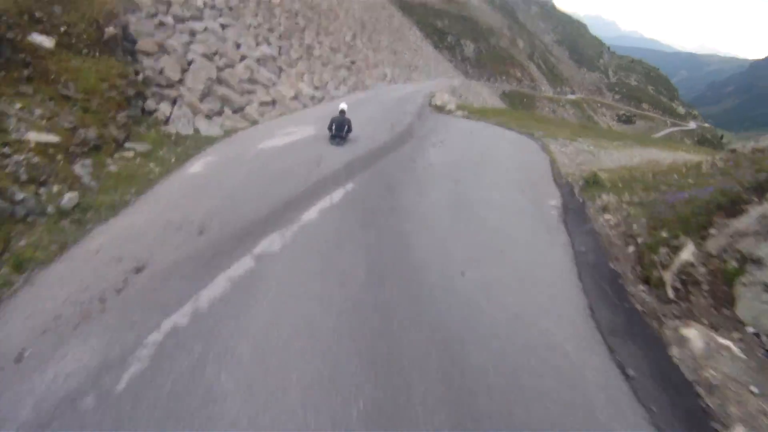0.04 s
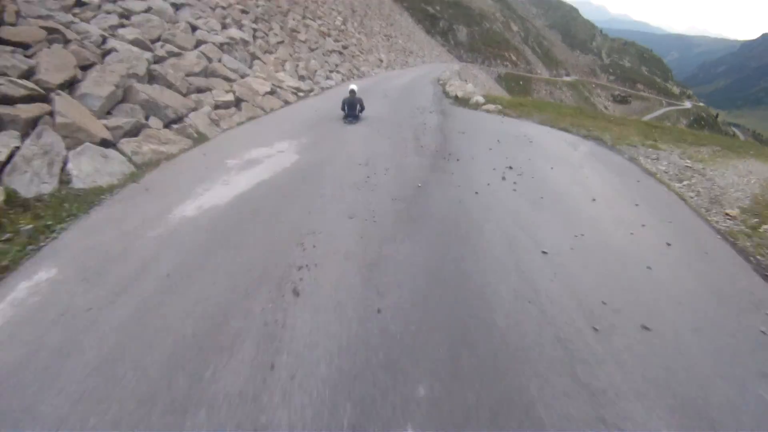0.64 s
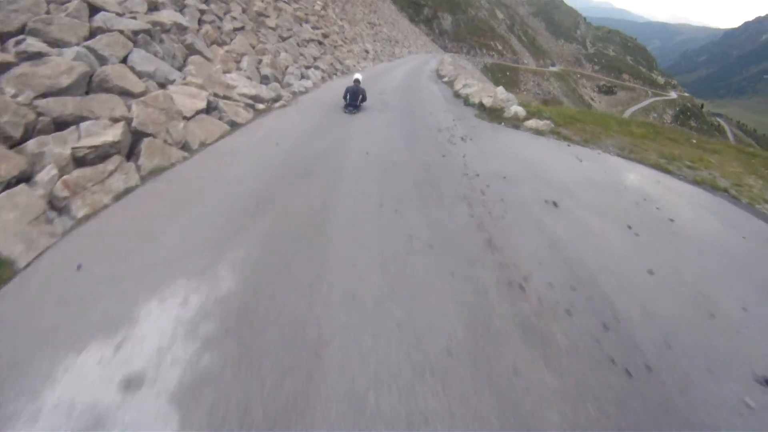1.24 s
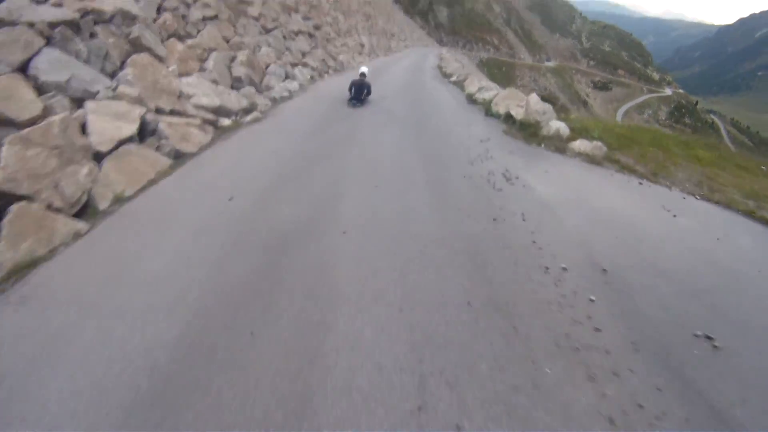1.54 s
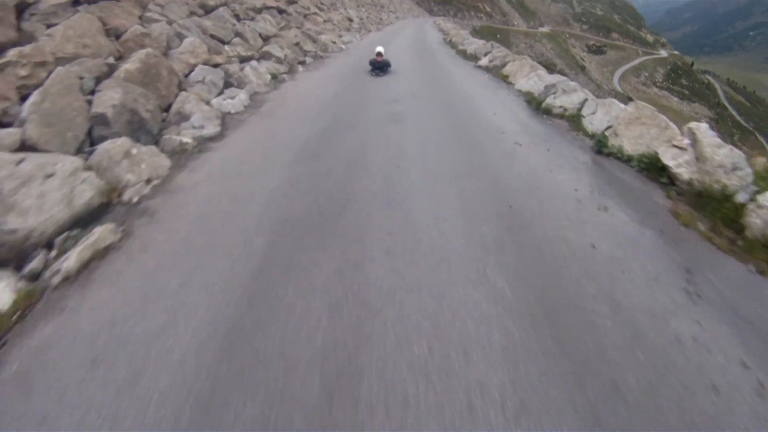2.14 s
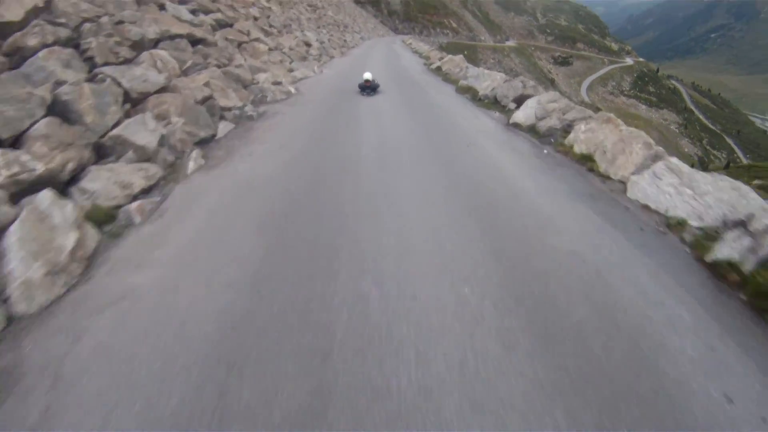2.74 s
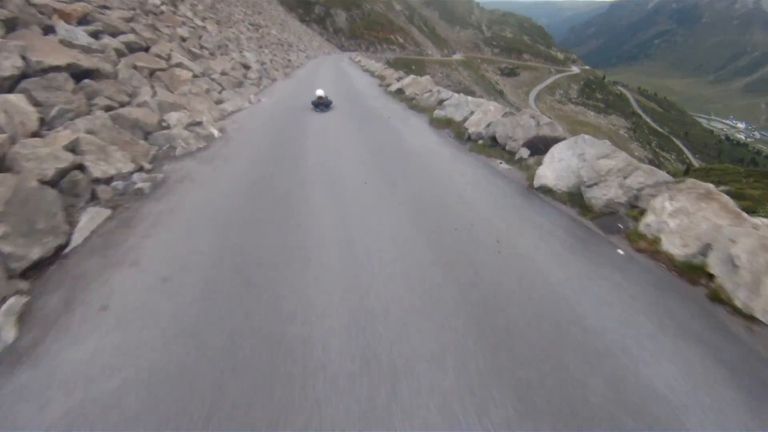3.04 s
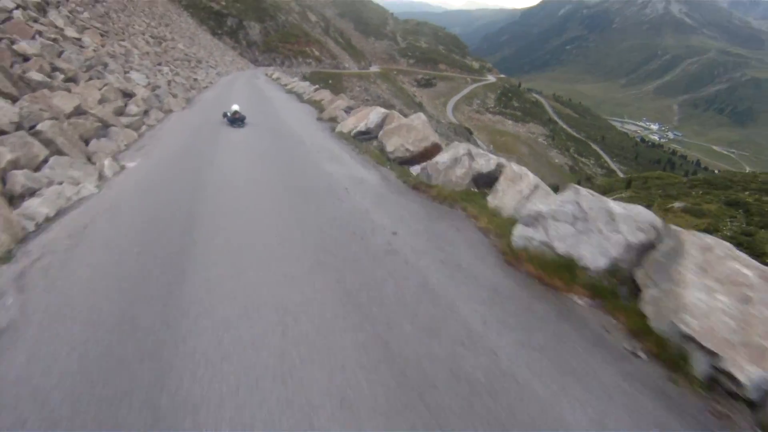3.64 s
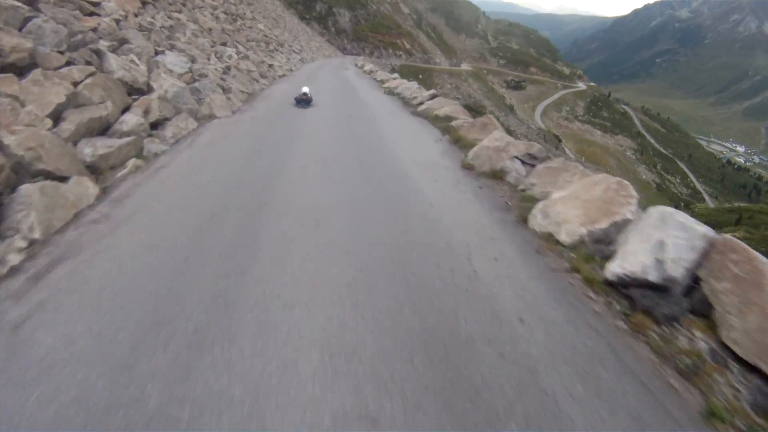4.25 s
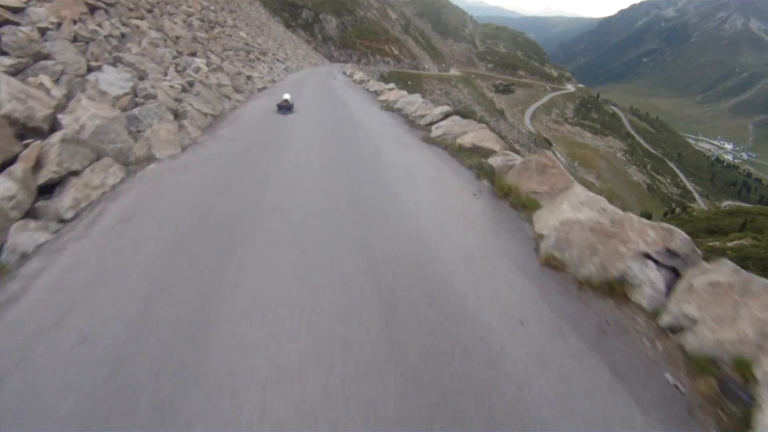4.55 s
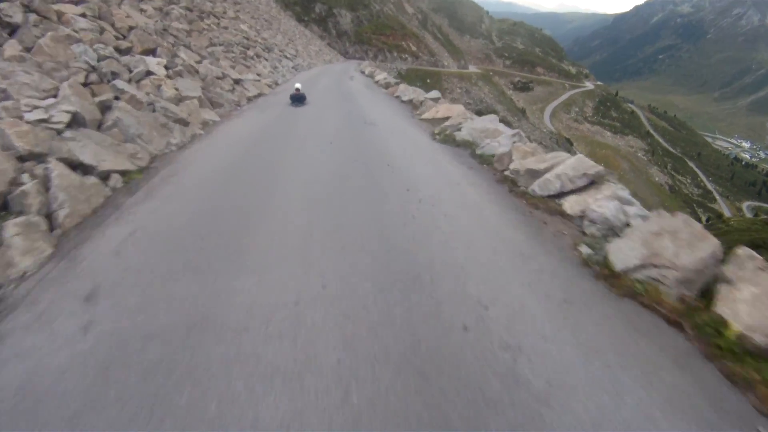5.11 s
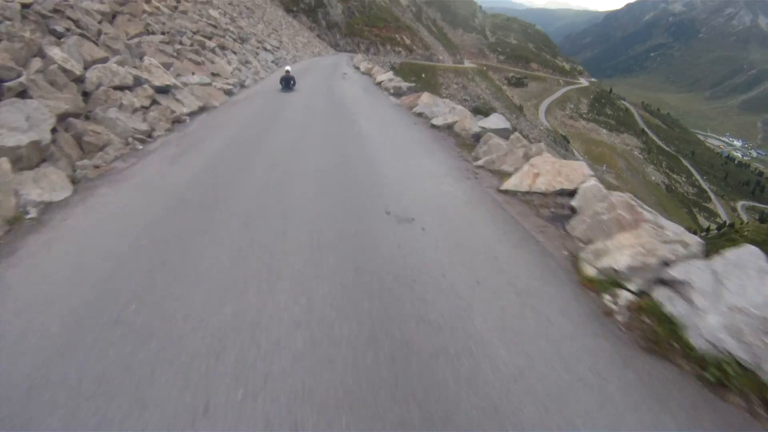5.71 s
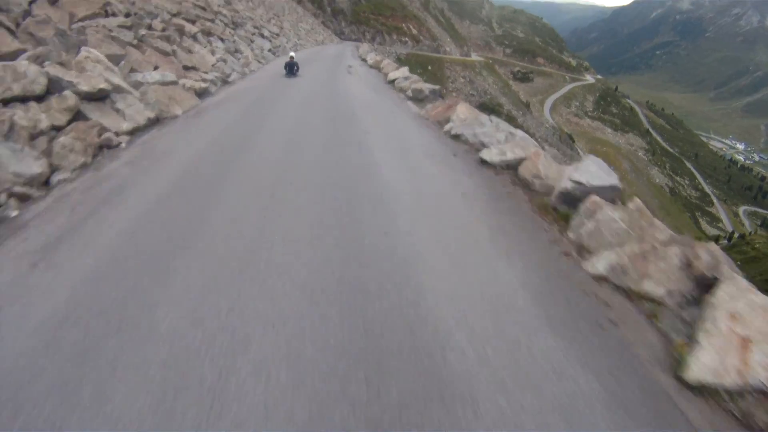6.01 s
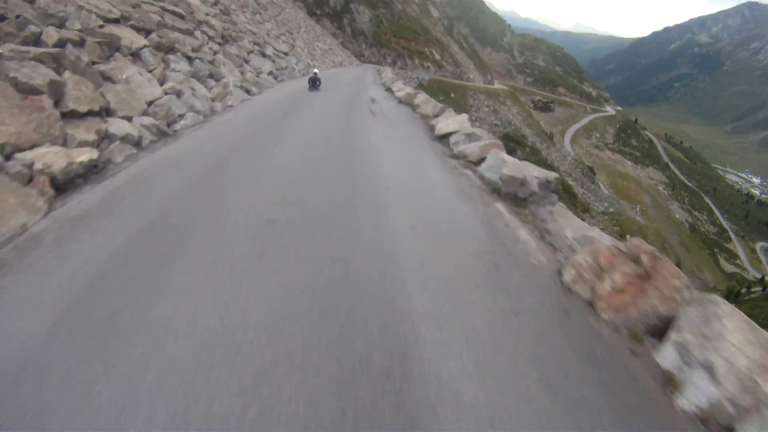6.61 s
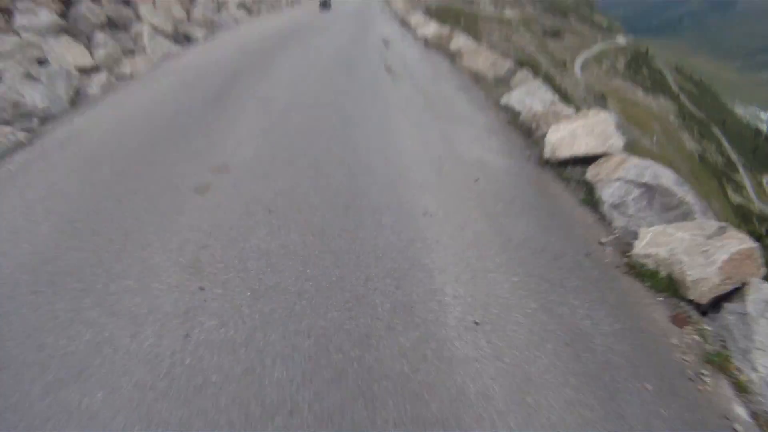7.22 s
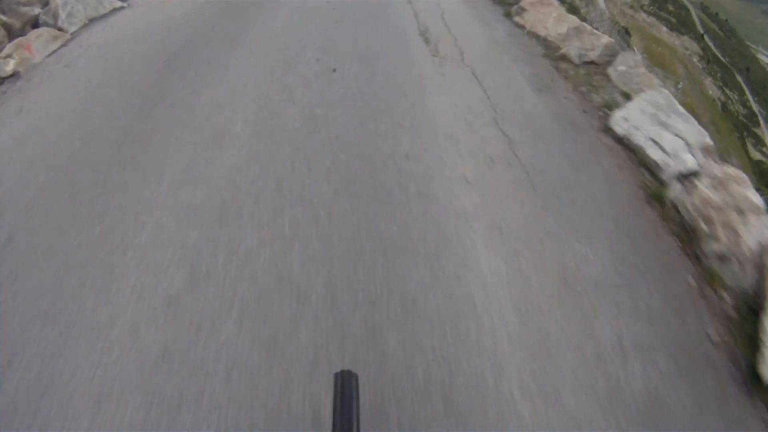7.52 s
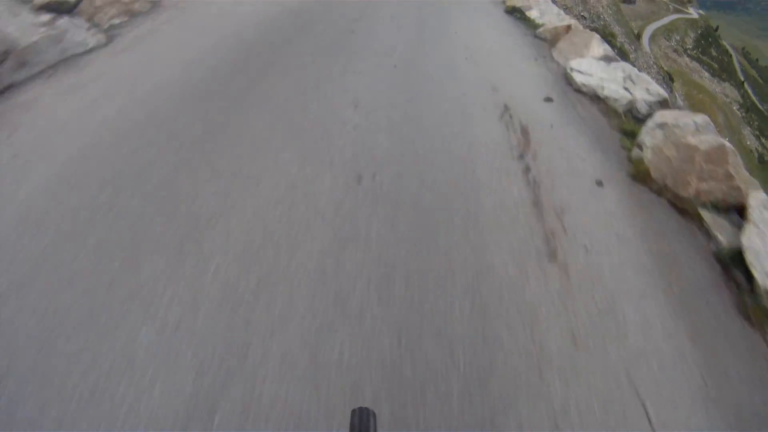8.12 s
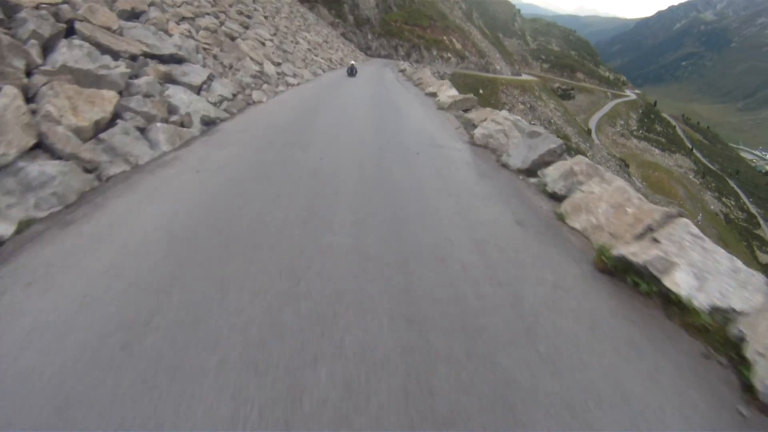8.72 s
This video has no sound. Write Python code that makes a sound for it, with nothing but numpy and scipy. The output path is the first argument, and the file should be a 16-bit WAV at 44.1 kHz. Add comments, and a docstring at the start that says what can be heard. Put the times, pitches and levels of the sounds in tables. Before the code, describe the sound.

A small gravity cart coasts down a mountain road in open air, heard from a microphone on board. From start to finish, about nine seconds, tyres roar and hum on grainy asphalt, the frame drones low and wind hisses and buffets the microphone. In the first 0.8 seconds, bumps thump the chassis, with metal clanks, chattering light parts and short creaks from the shell. A quick run of six ripples follows from 1.2 to 1.6 seconds, then harder bumps and another clatter around 1.7 to 1.9. One smaller bump rattles and creaks near 3.1 seconds. The ride then runs smoother, while the rumble, hum and buffeting gradually grow with speed. Around 6 to 7 seconds, dust patters on the underside, almost a hiss. Single bits of grit tick sharply at about 7.1, 7.6 and 8.6 seconds, with a faint rattle near 8.2. A thin glassy fizz lies over everything.

```python
"""A small gravity cart coasts down a mountain road, heard through a camera riding on it.
From the start, asphalt grain makes the tyres roar and hum, the frame drones and wind buffets the camera.
For about three seconds, bumps and a run of ripples thump the chassis: metal clanks, light parts chatter
and the shell creaks. The low sounds grow with speed; near 6.5 s dust patters on the underside, and then
three bits of grit tick against it. Throughout, the camera's sample-and-hold adds a glassy fizz."""
import sys
import numpy as np
from scipy import signal
from scipy.fft import rfft, irfft, next_fast_len
from scipy.io import wavfile
from scipy.ndimage import map_coordinates

SR = 44100
rng = np.random.default_rng(int(sys.argv[2]) if len(sys.argv) > 2 else 0)


def master_out(mix):
    """Clip the mix to full scale and print it as 16-bit PCM to the path in sys.argv[1]."""
    frames = np.transpose(np.atleast_2d(mix))
    ceiling = np.clip(frames, -1, 1)
    pcm = np.round(ceiling * 32767).astype(np.int16)
    wavfile.write(sys.argv[1], SR, pcm)


N = 386316


def tyres(road_db, from_middle_s):
    """Roughness excitation: stones drive the tread and the hollow tyre under a fluttering load."""
    # tread roar: frequency_hz, level_db
    roar_spectrum = [(250, -17.5), (560, -4.5), (850, -2.5), (980, -7.5), (1300, -1.5), (1460, -1),
                     (1630, 2), (1950, -5.5), (2600, -0.5), (2880, -1.5), (3300, -9), (4100, -17),
                     (4500, -13), (5600, -24)]
    # frame resonances that colour the roar: centre_hz, width_hz, lift_db
    frame_peaks = [(866, 43, 7), (1705, 170, 4.5), (2310, 180, 3), (3047, 165, 9.5), (4000, 64, -6)]
    # resonance of the hollow tyre: pitch_hz, width_hz, level_db
    tyre_modes = [(700.4, 68, 0)]
    load_db = 0.7 * drift(rate_hz=55)
    roar = colour(impacts(per_s=9000, spread_db=4), roar_spectrum, frame_peaks)
    hum = rms_one(resonate(impacts(per_s=5000, spread_db=2), tyre_modes))
    roar_db = -50.5 + 1.34 * road_db + load_db
    hum_db = -57 + 0.83 * road_db + 0.33 * from_middle_s
    return roar * from_db(roar_db) + hum * from_db(hum_db)


def frame_drone(air_db, from_middle_s, shake):
    """Forced vibration: the frame drones in a low band, louder with air stream, speed and shaking."""
    # response of the frame: frequency_hz, level_db
    drone_spectrum = [(200, -28), (310, -6.5), (385, 4.5), (440, 0.5), (520, -3.5), (700, -13.5)]
    drone_db = -64.5 + 0.74 * air_db + 0.7 * from_middle_s + 9.5 * shake
    return noise(drone_spectrum, drone_db)


def wind(air_db, from_middle_s, shake):
    """Turbulence: air hisses round the camera, and eddies press on it harder with speed and shaking."""
    # hiss of the flow: frequency_hz, level_db
    rush_spectrum = [(250, -11.5), (560, -3.5), (850, -7.5), (1050, -9), (1900, -12), (2120, 2),
                     (2420, 1.5), (2800, -9), (3500, -6.5), (3950, -10.5), (4400, -23.5), (5100, -12),
                     (5700, -16.5)]
    # eddy pressure: frequency_hz, level_db
    buffet_spectrum = [(10, -1.5), (20, 3.5), (30, -2.5), (45, -7.5), (60, -11.5), (80, -18.5),
                       (120, -35.5), (300, -40.5)]
    rush_db = -53 + 0.66 * air_db
    buffet_db = -43 + 0.15 * air_db + 0.5 * from_middle_s + 6 * shake
    return noise(rush_spectrum, rush_db) + noise(buffet_spectrum, buffet_db)


def road_jolts():
    """Impulsive forcing: each bump, and each of six evenly spaced ripples, kicks the wheels once."""
    # single bumps: start_s, level_db
    bumps = [(0.043, -26), (.328, -30), (0.415, -24), (0.499, -19.5), (.677, -31.5), (1.717, -21.5),
             (1.79, -19.5), (2.04, -36), (3.074, -29)]
    first_s, gap_s, first_db, loss_db = 1.232, 0.069, -24, 0.26
    ripples = [(first_s + k * gap_s, first_db - k * loss_db) for k in range(6)]
    jolts = np.zeros(N)
    for start_s, level_db in bumps + ripples:
        jolts[round(start_s * SR)] = from_db(level_db)
    return jolts


def shaking(jolts, settle_s=0.33, knee_db=-26.5):
    """Leaky integration: jolts pile up and die away, giving a shaking that saturates from 0 towards 1."""
    piled_up = signal.lfilter([1], [1, -np.exp(-1 / (settle_s * SR))], jolts)
    return np.tanh(piled_up / from_db(knee_db))


def chassis(road_db, from_middle_s, shake, jolts, low_hz=21.8, high_hz=46):
    """Damped response: the chassis rumbles on the asphalt, and each jolt heaves it through one swing."""
    # chassis rumble: frequency_hz, level_db
    rumble_spectrum = [(40, -34), (70, 1.5), (110, -1), (155, -0.5), (200, -6.5), (280, -11.5), (500, -16)]
    rumble_db = -56 + 0.43 * road_db + 0.58 * from_middle_s + 3 * shake
    kick = signal.unit_impulse(SR // 4)
    cushioned = signal.sosfilt(signal.butter(5, high_hz, fs=SR, output="sos"), kick)
    swing = signal.sosfilt(signal.butter(2, low_hz, "high", fs=SR, output="sos"), cushioned)
    thumps = signal.fftconvolve(jolts, swing / np.abs(swing).max())[:N]
    return noise(rumble_spectrum, rumble_db) + thumps


def metal_clanks():
    """Modal ringing: loose metal knocks and sounds at its natural frequencies."""
    # knocks: start_s, level_db, decay_s
    knocks = [(.2845, -34, .0053), (.2992, -37, 0.0037), (.3062, -30, .0063), (.3411, -26.5, 0.0039),
              (.3454, -28.5, .0037), (.4175, -31, 0.015), (.4492, -27.5, 0.0017), (.4523, -23.5, .0033),
              (1.6533, -27.5, .0094), (1.6888, -24.5, 0.0031)]
    # resonances of the metal: pitch_hz, width_hz, level_db
    metal_modes = [(1610, 100, -8), (2300, 400, -8), (2640, 130, -5), (3105, 100, 2.5), (4000, 300, -12),
                   (5000, 600, -16)]
    return rattle(knocks, metal_modes, contacts_per_s=3200, first_blow=1.3)


def light_chatter(road_db, shake):
    """Contact and rebound: light parts strike, fall back once, and tick at random while the cart shakes."""
    # strikes: start_s, level_db, decay_s
    strikes = [(0.2114, -34, 0.0057), (.3676, -39, 0.0083), (0.3964, -35, 0.0092), (0.4663, -32, 0.0027),
               (0.4777, -31.5, 0.015), (0.7436, -39, 0.021), (1.2725, -36.5, 0.0063), (1.556, -35, 0.0033),
               (1.5936, -32.5, .007), (1.698, -30, 0.005), (1.7777, -27, .004), (1.8297, -33.5, .004),
               (1.8644, -38, .006), (2.2323, -43, .004), (3.0178, -41, 0.0059), (3.1168, -43, 0.0041),
               (3.137, -35.5, 0.0085), (8.15, -39.5, 0.0065)]
    # resonances of the light parts: pitch_hz, width_hz, level_db
    part_modes = [(1580, 800, -9.5), (2610, 1100, -8), (3504, 190, 1), (4084, 89, -5), (4300, 2000, -12.5)]
    rebound_s, loss_db = 0.0068, 8.5
    rebounds = [(s + rebound_s, db - loss_db, decay_s) for s, db, decay_s in strikes]
    ticks_per_s, tick_decay_s = 18 * shake ** 2, 0.0046
    tick_samples = np.flatnonzero(rng.random(N) < ticks_per_s / SR)
    tick_db = -43.5 + road_db + 2.5 * rng.standard_normal(N)
    ticks = [(i / SR, tick_db[i], tick_decay_s) for i in tick_samples]
    hits = strikes + rebounds + ticks
    return from_db(1) * rattle(hits, part_modes, contacts_per_s=2100, first_blow=0.73)


def shell_creaks():
    """Flexural vibration: the body shell bends, and flurries of tiny contacts ring its modes."""
    # creaks: start_s, level_db, decay_s
    creaks = [(.135, -33, .025), (.287, -31.5, .02), (.408, -35, 0.0069), (.6, -37.5, 0.0099),
              (.69, -40.5, .015), (1.735, -35, 0.011), (1.812, -30.5, .007), (3.095, -38.5, 0.013)]
    # resonances of the shell: pitch_hz, width_hz, level_db
    shell_modes = [(1560, 360, 2.5), (1940, 320, 9), (2600, 260, 6.5), (3130, 220, -5)]
    return from_db(0.5) * rattle(creaks, shell_modes, contacts_per_s=3500, first_blow=0.4)


def grit_ticks():
    """Impact excitation: a bit of grit strikes the chassis and rings it briefly."""
    # strikes: start_s, level_db, decay_s, tilt_db_per_octave
    strikes = [(7.1205, -22.5, .0016, 1.5), (7.6355, -26.5, .0022, 0), (8.6037, -22, .0018, .5)]
    # resonances of the chassis: pitch_hz, width_hz, level_db
    chassis_modes = [(850, 150, -10), (1550, 380, -2.5), (2120, 220, 0), (2400, 280, 1), (3200, 300, -10),
                     (3750, 200, -8), (4800, 700, -13)]
    return from_db(-0.7) * rattle(strikes, chassis_modes, contacts_per_s=5000, first_blow=2.3)


def dust(road_db):
    """Shot noise: grains patter on the underside and merge towards a hiss on one dusty stretch."""
    # resonances of the underside: pitch_hz, width_hz, level_db
    underside_modes = [(3300, 370, 0.5), (4080, 220, 0.5), (5600, 1000, -3.5)]
    middle_s, half_length_s, lift_db = 6.45, 0.42, 8.8
    thrown_db = road_db + lift_db * np.exp(-((np.arange(N) / SR - middle_s) / half_length_s) ** 2)
    grains_per_s = 450 * from_db(1.6 * thrown_db)
    grains = impacts(grains_per_s, spread_db=1.5) / np.sqrt(grains_per_s)  # equal power at any rate
    return from_db(-64 + 0.97 * thrown_db) * rms_one(resonate(grains, underside_modes))


def camera_case(x):
    """Resonance and antiresonance: the closed case lifts some narrow bands and swallows others."""
    # peaks and dips of the case: centre_hz, width_hz, lift_db
    case_bands = [(1314, 97, 2.5), (1397, 170, -2), (1920, 160, 0.5), (1980, 72, 2), (2936, 150, -2.5),
                  (3290, 110, -2.5), (3815, 150, -5.5), (3920, 170, 3), (4440, 160, -7), (4460, 68, 1)]
    for centre_hz, width_hz, lift_db in case_bands:
        x = x + (from_db(lift_db) - 1) * resonate(x, [(centre_hz, width_hz, 0)])
    return x


def rattle(hits, modes, contacts_per_s, first_blow):
    """Repeated contact: a blow and a dying flurry ring a part; an optional tilt brightens the hit."""
    out, t = np.zeros(N + SR), np.arange(SR // 10) / SR
    for start_s, level_db, decay_s, *tilt in hits:
        touching = rng.random(len(t)) < contacts_per_s / SR
        contacts = touching * rng.standard_normal(len(t)) * np.exp(-t / decay_s)
        contacts[0] = first_blow
        tilted_modes = [(hz, width_hz, db + sum(tilt) * np.log2(hz)) for hz, width_hz, db in modes]
        ring = resonate(contacts, tilted_modes)
        start = round(start_s * SR)
        out[start:start + len(t)] += from_db(level_db) * ring / np.abs(ring).max()
    return out[:N]


def impacts(per_s, spread_db):
    """Poisson process: independent clicks of random sign and uneven size."""
    struck = rng.random(N) < per_s / SR
    return struck * rng.choice([-1, 1], N) * from_db(spread_db * rng.standard_normal(N))


def resonate(x, modes):
    """Modal superposition: damped resonators in parallel, summed with alternating sign."""
    out = 0
    for k, (pitch_hz, width_hz, level_db) in enumerate(modes):
        radius = np.exp(-np.pi * width_hz / SR)
        poles = [1, -2 * radius * np.cos(2 * np.pi * pitch_hz / SR), radius ** 2]
        ring = (1 - radius ** 2) / 2 * signal.lfilter([1, 0, -1], poles, x)
        out = out + (-1) ** k * from_db(level_db) * ring
    return out


def colour(x, spectrum, peaks=()):
    """Spectral shaping: a broad curve with resonance peaks on top filters x; the result has unit power."""
    size = next_fast_len(N)
    hz = np.maximum(np.fft.rfftfreq(size, 1 / SR), 1)
    points_hz, levels_db = np.transpose(spectrum)
    octaves_outside = np.abs(np.log2(hz / np.clip(hz, points_hz[0], points_hz[-1])))
    gain_db = np.interp(np.log(hz), np.log(points_hz), levels_db) - 24 * octaves_outside
    for centre_hz, width_hz, lift_db in peaks:
        gain_db += lift_db / (1 + (2 * (hz - centre_hz) / width_hz) ** 2)
    return rms_one(irfft(rfft(x, size) * from_db(gain_db), size)[:N])


def noise(spectrum, level_db):
    """Amplitude modulation: coloured Gaussian noise follows a level curve."""
    return colour(rng.standard_normal(N), spectrum) * from_db(level_db)


def drift(rate_hz):
    """Random fluctuation of unit power, gliding to a new value rate_hz times a second."""
    knots = rng.standard_normal(4000)
    return rms_one(map_coordinates(knots, [np.arange(N) / SR * rate_hz], order=1, mode="wrap"))


def in_time(curve):
    """Linear interpolation of a curve at every sample."""
    return np.interp(np.arange(N) / SR, *np.transpose(curve))


def from_db(db):
    """Decibels to amplitude ratio."""
    return 10 ** (np.asarray(db) / 20)


def rms_one(x):
    """Normalisation to unit power."""
    return x / np.sqrt(np.mean(x ** 2) + 1e-20)


def scene():
    """Superposition: all sources add on board, in open air, and pass through the camera case."""
    # coarseness of the asphalt: time_s, level_db
    coarseness = [(0.0, -57.5), (0.49, -55), (0.56, -60.5), (0.7, -57.5), (0.75, -64), (1.17, -63),
                  (1.71, -55.5), (2.24, -62.5), (2.56, -57.5), (2.85, -63), (3.12, -60), (4.71, -55),
                  (5.05, -56.5), (5.98, -54), (6.46, -57), (6.78, -53), (7.83, -67.5), (8.76, -56.5)]
    # strength of the air stream: time_s, level_db
    air_stream = [(0.0, -49.5), (1.22, -59.5), (1.61, -55), (2.83, -58.5), (4.61, -53), (6.71, -52),
                  (8.12, -55.5), (8.76, -57)]
    usual_road_db, usual_air_db = -58.5, -55.5
    road_db = in_time(coarseness) - usual_road_db
    air_db = in_time(air_stream) - usual_air_db
    from_middle_s = np.arange(N) / SR - 4.56  # the cart gathers speed, so low sounds grow with this
    jolts = road_jolts()
    shake = shaking(jolts)
    rolling = tyres(road_db, from_middle_s) + frame_drone(air_db, from_middle_s, shake)
    underside = dust(road_db) + chassis(road_db, from_middle_s, shake, jolts)
    air = wind(air_db, from_middle_s, shake)
    rattles = metal_clanks() + shell_creaks() + grit_ticks() + light_chatter(road_db, shake)
    return camera_case(rolling + underside + air + rattles)[None]


def record(dry):
    """Spectral imaging: holding each slow sample mirrors the sound into the treble; the top is then cut."""
    camera_rate_hz, hold_steps, anti_alias_hz, cutoff_hz = 12000, 4, 5680, 15400
    smooth = signal.fftconvolve(dry, signal.firwin(81, anti_alias_hz, fs=SR)[None], "same")
    coarse = signal.resample_poly(smooth, camera_rate_hz, SR, axis=1)
    held = np.repeat(coarse, hold_steps, axis=1)
    fizzy = signal.resample_poly(held, SR, hold_steps * camera_rate_hz, axis=1)[:, :N]
    return signal.fftconvolve(fizzy, signal.firwin(401, cutoff_hz, fs=SR)[None], "same")


dry = scene()
out = record(dry)
master_out(out)
```